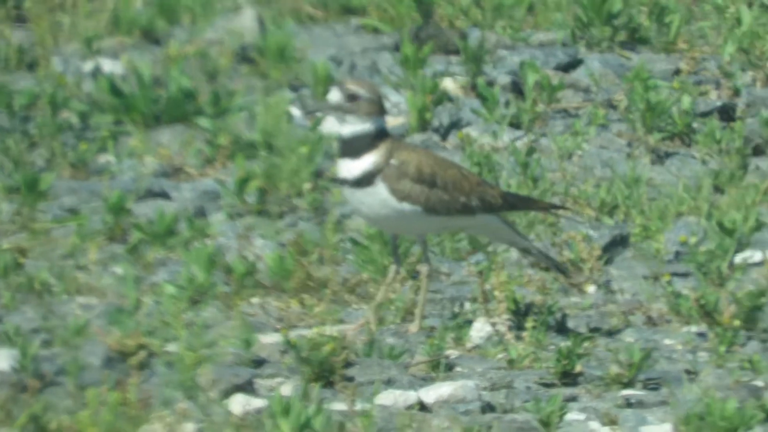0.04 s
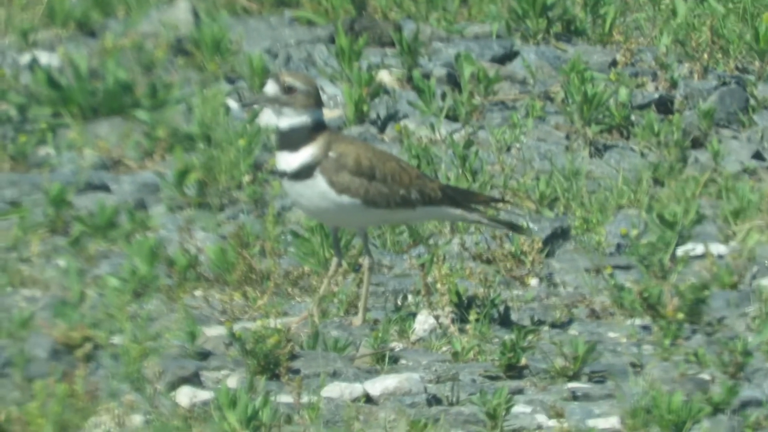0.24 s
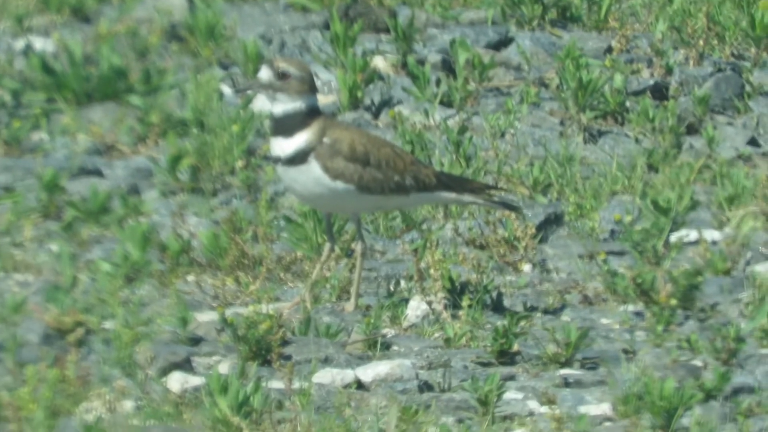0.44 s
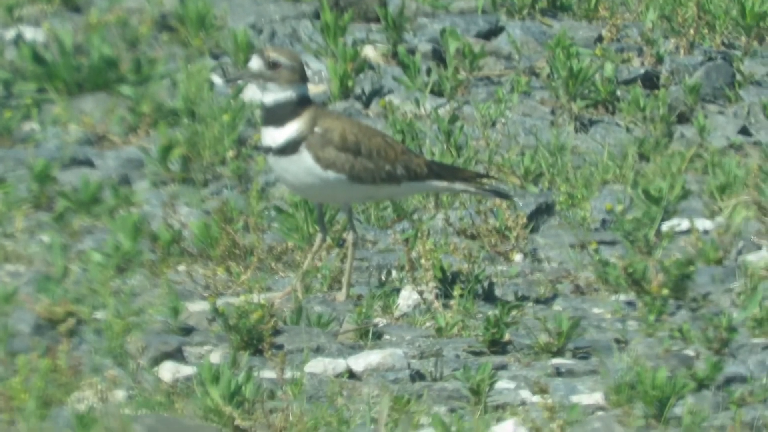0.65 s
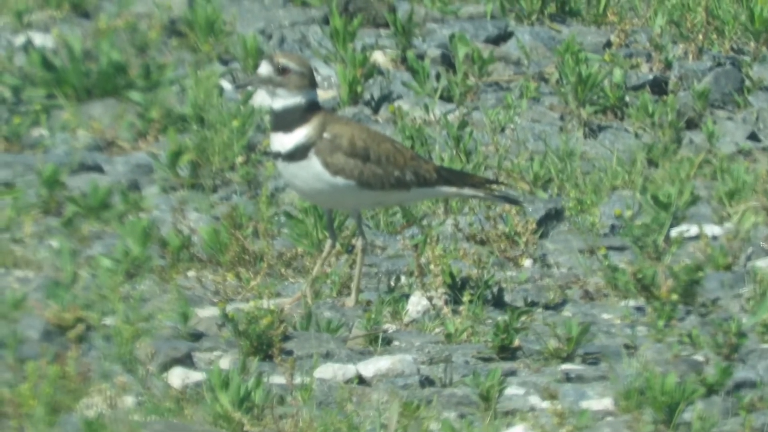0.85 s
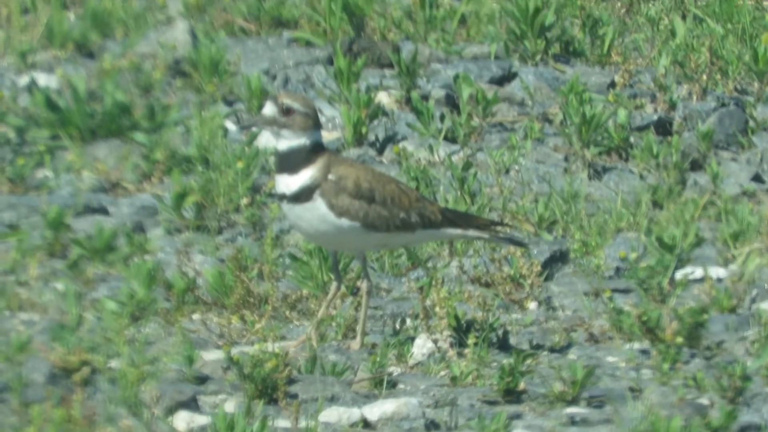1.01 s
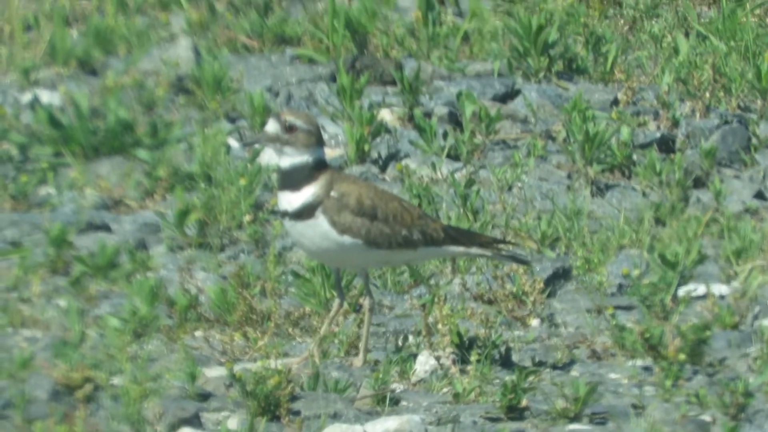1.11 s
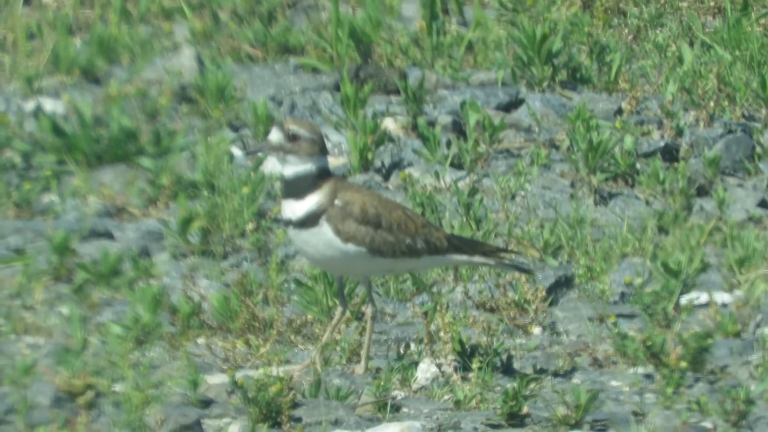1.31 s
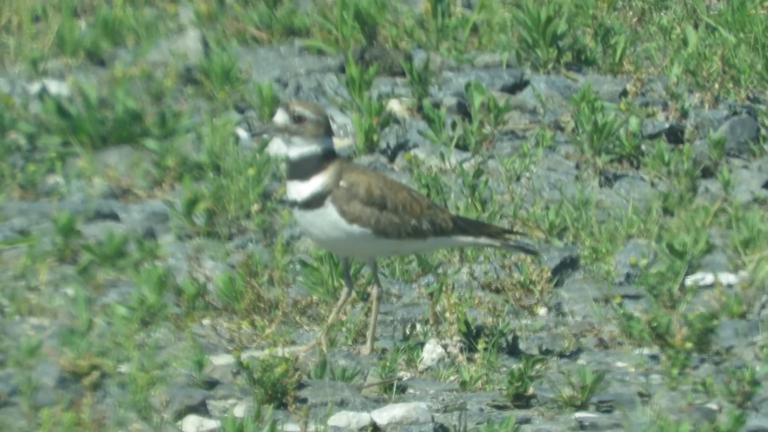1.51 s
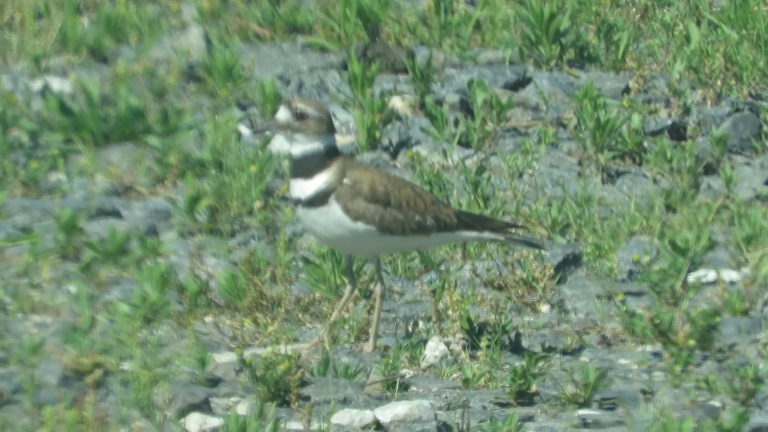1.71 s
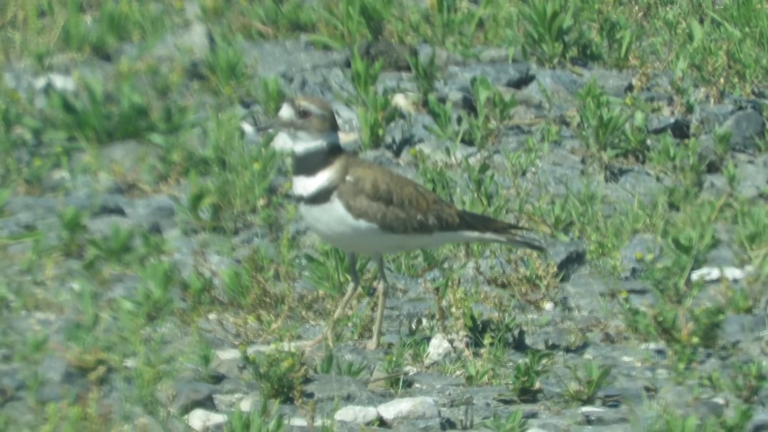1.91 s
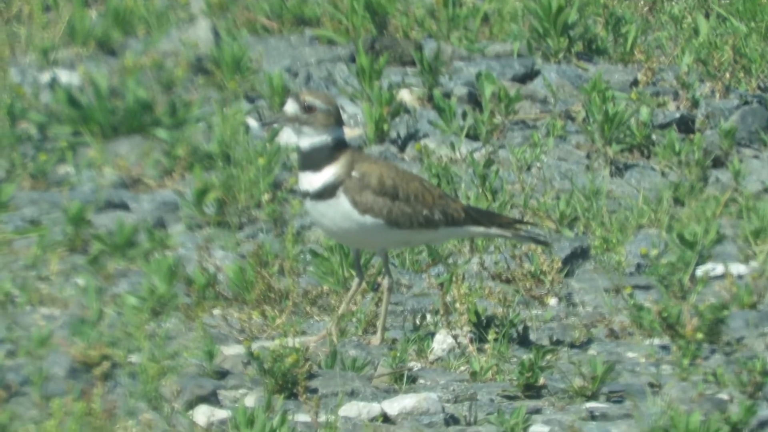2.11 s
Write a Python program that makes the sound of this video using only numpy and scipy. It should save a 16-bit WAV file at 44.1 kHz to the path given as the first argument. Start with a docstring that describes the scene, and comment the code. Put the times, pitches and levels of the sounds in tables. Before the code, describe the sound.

Four clean, piercing plover notes ring out at uneven gaps, each with a brief echo. Gliding whistles from other birds fill the first half, then short buzzes and pipes, in a quiet open place, closely recorded.

```python
"""Open stony ground: a shorebird calls four times near the microphone, after the echo of an earlier call.
Each of the four is a double tick, made of tiny ringing pops, then a short clear note built from overtones.
Farther birds whistle and pipe (gliding sine tones) and buzz (a comb of wavering tones) in between.
Echoes from the ground and scrub, made of random scattered returns, trail after every note.
Beneath it all lies a faint outdoor hush of shaped noise."""
import sys
import numpy as np
from scipy import signal
from scipy.io import wavfile
from scipy.ndimage import uniform_filter1d

SR = 44100
rng = np.random.default_rng(int(sys.argv[2]) if len(sys.argv) > 2 else 0)


def file_out(sig):
    """Save sig as 16-bit WAV at sys.argv[1]."""
    # one column per channel
    cols = np.atleast_2d(sig).T
    # limit, then scale
    lim = np.clip(cols, -1, 1)
    pcm = np.round(lim * 32767).astype(np.int16)
    wavfile.write(sys.argv[1], SR, pcm)


def makeup_ratio(level_db):
    """Linear amplitude ratio for a level in decibels (20 dB per factor of ten)."""
    decades = np.asarray(level_db, float) / 20
    return 10 ** decades


N = 94815
PRE = SR // 2  # samples made ahead of time zero, so that an earlier call can still echo


def read(points, hz, col=1):
    """Reads one column of a table at any frequency, along a logarithmic pitch scale."""
    p = np.array(points, float)
    return np.interp(np.log(hz + 1), np.log(p[:, 0] + 1), p[:, col])


def add(mix, start_s, sound):
    """Adds a sound to the mix from its start time on."""
    part = mix[PRE + round(start_s * SR):][:len(sound)]
    part += sound[:len(part)]


def smooth(u):
    """A soft step from 0 to 1 while u goes from 0 to 1."""
    return np.sin(np.pi / 2 * np.clip(u, 0, 1)) ** 2


def near_call(length, hz, db, mid2_db, mid3_db, tilt_db):
    """A clean note of whole-number partials; the even ones speak first, all swell when the odd ones join."""
    # level of each partial, from the fundamental up: (level [dB])
    partials_db = [-8.5, 0, -18, -18, -39, -39.5, -45.5]
    # pitch offsets as shares of the held pitch: starts at scoop, peaks, falls to the hold, hooks up, droops
    scoop, peak, hook_up, droop = 0.014, 0.07, 0.026, -0.03
    peak_s, fall_s, hook_s, release_s = 0.01, 0.037, 0.019, 0.012
    jump_s, jump = 0.0021, 0.48  # the even partials jump to this share at once
    odd_late_s, rise_s = 0.0035, 0.005
    swell_db = 0.5  # gain over the length of the note
    end_dull_db = -1  # change per partial above the third, through the hook

    t = np.arange(0, length + release_s, 1 / SR)
    hook = smooth(1 + (t - length) / hook_s)
    bend = scoop + (peak - scoop) * smooth(t / peak_s)
    bend -= peak * smooth((t - peak_s) / fall_s)
    bend += hook_up * hook + droop * smooth((t - length) / release_s)
    turns = 2 * np.pi * np.cumsum(hz * (1 + bend)) / SR
    arch = np.sin(np.pi * np.clip(t / length, 0, 1) ** 1.4) ** 2
    late = smooth((t - odd_late_s) / rise_s)
    early = jump * smooth(t / jump_s) + (1 - jump) * late
    out = np.zeros(len(t))
    for k, part_db in enumerate(partials_db, 1):
        change_db = {2: mid2_db, 3: mid3_db}.get(k, 0) * arch
        change_db = change_db + (tilt_db + end_dull_db * hook) * max(k - 3, 0)
        rise = late if k % 2 else early
        out += makeup_ratio(part_db + change_db) * rise * np.cos(k * turns)
    release = smooth((length + release_s - t) / release_s)
    return np.sqrt(2) * makeup_ratio(db + swell_db * t / length) * release * out


def echo(x, bands):
    """Scattered returns: a quick dense tail and a faint long one, coloured by band."""
    long_db, long_t60, start_s = -35.5, 0.73, 0.008  # long tail against the quick one, its fade by 60 dB [s]
    taps = np.zeros(SR)
    slots = np.arange(0, SR - 20, 20)
    # one return in every 20 samples, at a random spot and with a random sign
    taps[slots + rng.integers(0, 20, len(slots))] = rng.choice([-1., 1.], len(slots))
    hz, t, z = signal.stft(taps, SR, nperseg=256)
    t60 = read(bands, hz, col=2)[:, None]
    fade = makeup_ratio(-60 * t / t60) + makeup_ratio(long_db - 60 * t / long_t60)
    colour = makeup_ratio(read(bands, hz))[:, None] / np.sqrt(t60)
    tail = signal.istft(z * fade * colour, SR, nperseg=256)[1]
    tail = tail / np.sqrt(SR / 20 / (2 * np.log(1000)))  # evens out the number of returns
    delay = np.zeros(round(start_s * SR))
    return signal.fftconvolve(x, np.r_[delay, tail])[:len(x)]


def hush():
    """Steady outdoor noise with faint drifting patches."""
    # colour of the noise, before the whole is set to one level: (frequency [Hz], relative level [dB per Hz])
    noise_colour = [(50, -26.5), (100, -9.5), (150, -9), (195, 1.5), (300, -9.5), (500, -5), (800, -12),
                    (1300, -7.5), (2000, -14.5), (3200, -18), (12000, -23), (13000, -29.5), (16000, -48.5)]
    hush_db, patch_db = -67.5, 1.0  # overall level, usual size of the patches
    frames, hz = N // 256 + 5, np.fft.rfftfreq(1024, 1 / SR)
    a, b, patches = rng.standard_normal((frames, 513, 3)).T
    patches = uniform_filter1d(patches, size=10, axis=0)  # across frequency
    patches = uniform_filter1d(patches, size=12, axis=1)  # across time
    gain = makeup_ratio(read(noise_colour, hz)[:, None] + patch_db * patches / patches.std())
    x = signal.istft((a + 1j * b) * gain, nperseg=1024, noverlap=768)[1][:N]
    return makeup_ratio(hush_db) * x / x.std()


def note(start, length, from_hz, to_hz, db):
    """A short pure whistle gliding evenly between two pitches."""
    rise_s, fall_s = 0.022, 0.018  # at most; each is held to half the note
    t = np.arange(0, length, 1 / SR)
    shape = smooth(t / min(rise_s, length / 2)) * smooth((length - t) / min(fall_s, length / 2))
    hz = from_hz + (to_hz - from_hz) * t / length
    return start, np.sqrt(2) * makeup_ratio(db) * shape * np.sin(2 * np.pi * np.cumsum(hz) / SR)


def tick(peak_s, db):
    """A short pop in the throat: a few tones that swell and die within milliseconds."""
    # tones of one pop: (frequency [Hz], rise [s], fall [s], level [dB])
    pop_tones = [(2000, .00025, .00045, -2), (5300, .00025, .0004, -17), (1350, .0004, .0006, -16),
                 (680, .0012, .0016, -35)]
    t = np.arange(-88, 132) / SR
    pop = np.zeros(len(t))
    for hz, rise, fall, part_db in pop_tones:
        shape = np.exp(-(t / np.where(t < 0, rise, fall)) ** 2 / 2)
        pop += makeup_ratio(part_db) * shape * np.cos(2 * np.pi * hz * t)
    return peak_s + t[0], -makeup_ratio(db) * pop


def whistle(rows):
    """A near sine along its curve, with an octave overtone where one is listed."""
    r = np.array(rows, float)
    t = np.arange(r[0, 0], r[-1, 0], 1 / SR)
    # the corners of each curve are rounded off
    hz, *dbs = (uniform_filter1d(np.interp(t, r[:, 0], c), size=200) for c in r.T[1:])
    turns = 2 * np.pi * np.cumsum(hz) / SR
    ends = smooth((t - t[0]) / 0.009) * smooth((t[-1] - t) / 0.014)
    tone = sum(makeup_ratio(db) * np.sin(k * turns) for k, db in enumerate(dbs, 1))
    return t[0], np.sqrt(2) * ends * tone


def buzz(peak_s, rise, fall, hz, width, db):
    """A fast rattle heard as a comb of wavering, fluttering lines, loudest near its centre."""
    # lines of the comb: (frequency [Hz])
    comb_hz = [3435, 3640, 3830, 3975]
    waver_hz, flutter_db = 7, 3.5  # usual size of the random pitch and level changes
    t = np.arange(-.1, .12, 1 / SR)
    out = np.zeros(len(t))
    for line in comb_hz:
        drift = rng.standard_normal((len(t), 2))
        for _ in range(2):
            drift = uniform_filter1d(drift, size=250, axis=0)
        waver, flutter = (drift / drift.std(axis=0)).T
        turns = 2 * np.pi * np.cumsum(line + waver_hz * waver) / SR
        nearness = np.exp(-((line - hz) / width) ** 2)
        out += makeup_ratio(flutter_db * flutter) * nearness * np.sin(turns)
    shape = np.exp(-(t / np.where(t < 0, rise, fall)) ** 2)
    return peak_s + t[0], makeup_ratio(db) * shape * out


def scene():
    """Places the near and far birds, gives each group its echo and lays the hush beneath."""
    # near calls, the first over before time zero and heard only as echo: (start [s], length [s],
    # held pitch [Hz], level [dB], mid-call change of partial 2 [dB], of partial 3 [dB],
    # treble tilt [dB per partial above the third])
    near_rows = [(-.22, .12, 2150, -26, -1, -1, -.1), (.1955, .116, 2163, -25, 2, -2, -.1),
                 (.6335, .122, 2146, -24, -6, -2, .3), (1.2293, .12, 2128, -25, -1, -7, -.1),
                 (1.7925, .12, 2120, -25, 1, -9, -.3)]
    # throat pops before the calls: (peak time [s], level [dB])
    tick_rows = [(.1908, -42), (.1926, -30), (.6276, -31), (.6295, -36), (1.2232, -30), (1.225, -35),
                 (1.7874, -30), (1.7893, -36)]
    # short far whistles: (start [s], length [s], first pitch [Hz], last pitch [Hz], level [dB])
    note_rows = [(0.181, 0.012, 2930, 2470, -48), (1.438, 0.049, 3130, 3320, -49.5),
                 (1.542, 0.046, 2367, 2300, -33), (1.649, 0.045, 2353, 2387, -35.5),
                 (1.546, 0.046, 4813, 4350, -38), (1.657, 0.041, 4650, 4754, -44),
                 (2.128, .06, 2567, 2662, -54)]
    # far whistles that swell and bend, one list of points each:
    # (time [s], pitch [Hz], level [dB], octave overtone level [dB] where there is one)
    whistle_curves = [
        [(.228, 2600, -62.5, -90), (.268, 2570, -45, -72), (.281, 2500, -28, -56), (.293, 2570, -24, -49),
         (.312, 2577, -22, -39.5), (.34, 2505, -28.5, -47.5)],
        [(.336, 2415, -45.5, -47.5), (.428, 2510, -25.5, -35), (.476, 2576, -23.5, -43),
         (.54, 2614, -25, -29.5), (.57, 2654, -33.5, -38.5), (.605, 2691, -29, -63.5),
         (.632, 2680, -50.5, -72.5)],
        [(.548, 3100, -61.5), (.59, 3200, -53.5), (.604, 3213, -32), (.651, 3128, -32), (.662, 3150, -51.5),
         (.75, 3200, -65)],
        [(1.47, 3190, -43), (1.484, 3173, -29.5), (1.535, 3118, -32), (1.558, 3140, -46.5),
         (1.578, 3140, -40.5), (1.606, 3172, -38), (1.62, 3256, -50), (1.664, 3197, -35.5), (1.69, 3200, -59.5),
         (1.72, 3276, -48), (1.88, 3244, -81.5)],
    ]
    # far buzzy notes: (peak time [s], rise [s], fall [s], centre [Hz], width [Hz], level [dB])
    buzz_rows = [(1.343, 0.0066, 0.011, 3670, 400, -35.5), (1.325, 0.015, 0.06, 3500, 330, -50.5),
                 (1.43, 0.031, 0.052, 3520, 322, -41), (1.462, 0.0047, 0.0054, 3440, 119, -27.5),
                 (1.476, 0.0029, 0.0066, 3380, 150, -34), (1.617, 0.015, 0.015, 3850, 199, -37.5),
                 (1.641, 0.04, 0.036, 3470, 350, -50)]
    # echo of the near bird: (frequency [Hz], level [dB], time to fade by 60 dB [s])
    near_echo = [(2000, -28.5, 0.22), (3200, -18.5, 0.56), (4470, -5, 0.1), (6255, -23.5, 0.45),
                 (9100, -24, 0.17)]
    # echo of the far birds: (frequency [Hz], level [dB], time to fade by 60 dB [s])
    far_echo = [(2300, -10, 0.18), (3200, -14.5, 0.37), (4840, -10, 0.33)]

    near, far = np.zeros((2, PRE + N))
    for start_s, *row in near_rows:
        add(near, start_s, near_call(*row))
    for row in note_rows:
        add(far, *note(*row))
    for row in tick_rows:
        add(near, *tick(*row))
    for rows in whistle_curves:
        add(far, *whistle(rows))
    for row in buzz_rows:
        add(far, *buzz(*row))
    birds = near + echo(near, near_echo) + far + echo(far, far_echo)
    return (birds[PRE:] + hush())[None]


def top_cut(x):
    """Nothing passes above the cut-off."""
    return signal.sosfilt(signal.butter(12, 15300, fs=SR, output="sos"), x)


def record(dry):
    """Takes away the treble above about 15 kHz and finishes the mix."""
    low_pass = signal.firwin(401, 15250, window=("kaiser", 8), fs=SR)[None]
    finished = signal.oaconvolve(dry, low_pass, "same")
    return top_cut(finished)


dry = scene()
out = record(dry)
file_out(out)
```